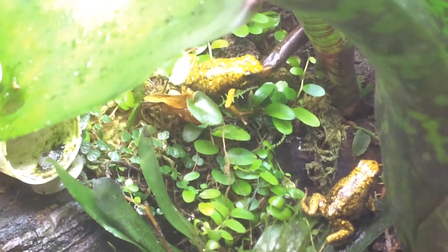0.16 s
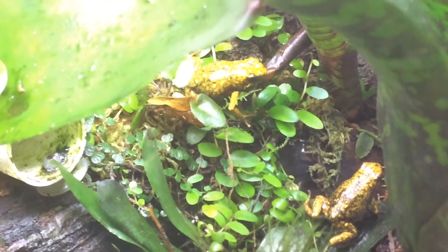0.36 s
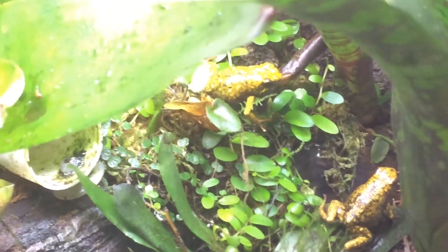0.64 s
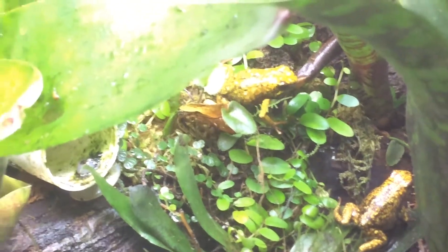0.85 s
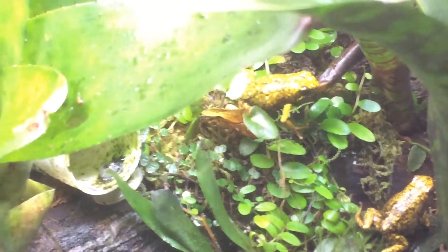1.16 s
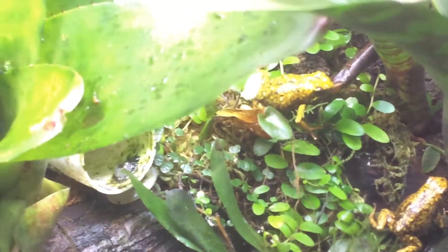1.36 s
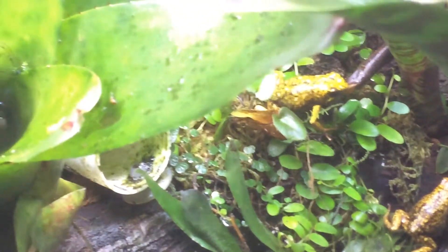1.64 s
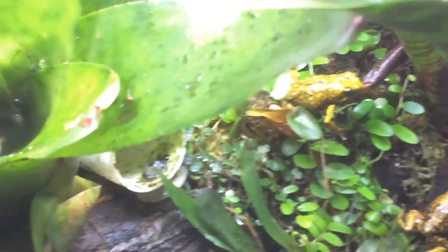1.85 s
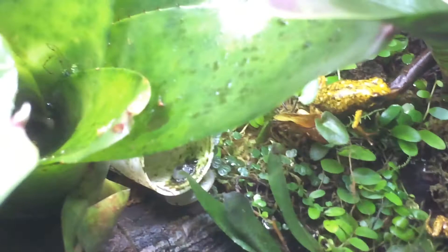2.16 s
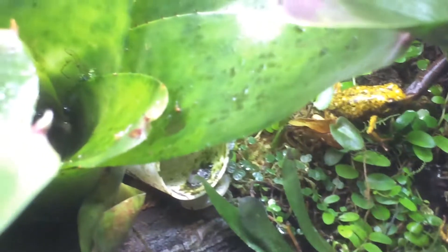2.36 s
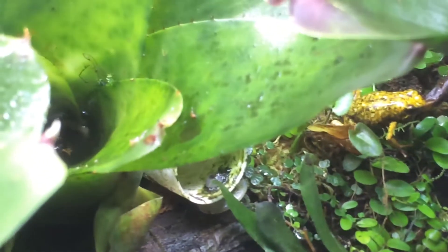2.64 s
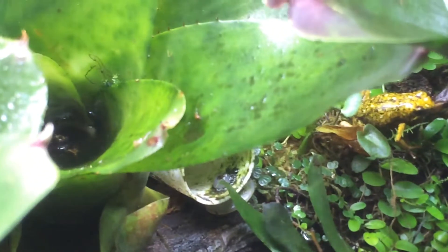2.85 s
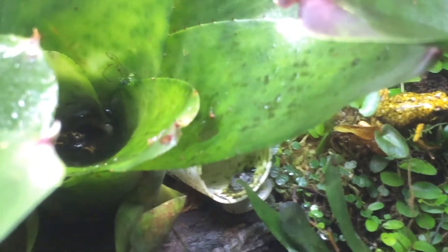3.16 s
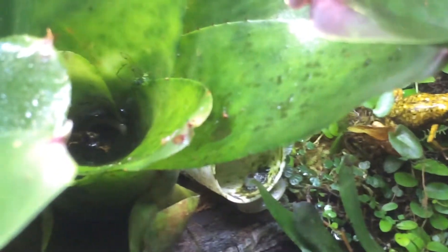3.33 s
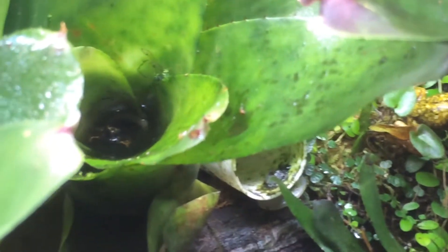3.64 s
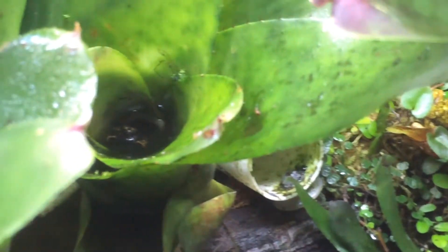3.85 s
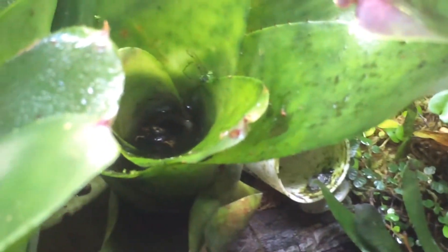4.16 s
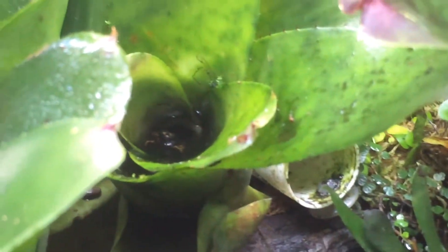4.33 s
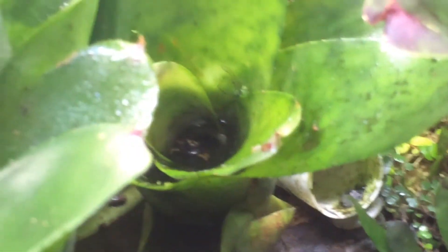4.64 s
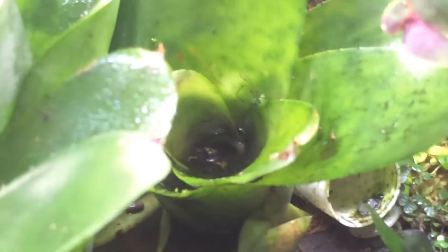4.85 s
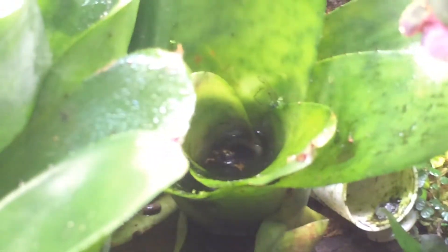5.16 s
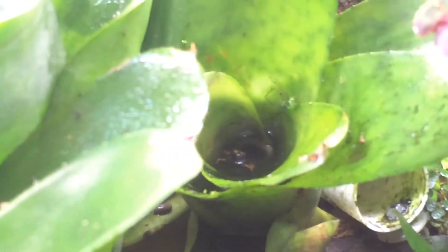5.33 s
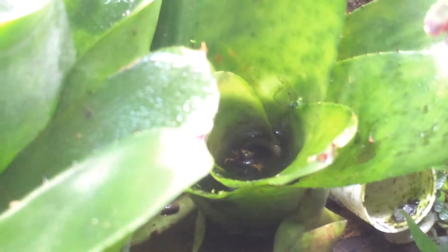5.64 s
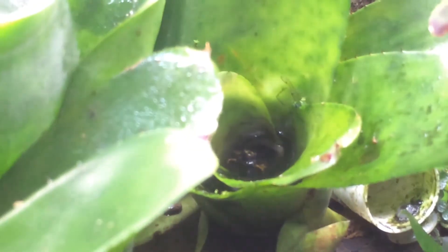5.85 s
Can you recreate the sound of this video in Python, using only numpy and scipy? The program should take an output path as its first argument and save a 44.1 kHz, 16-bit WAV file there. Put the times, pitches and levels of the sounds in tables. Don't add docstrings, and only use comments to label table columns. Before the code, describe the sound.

A small frog chirps steadily about six times a second in a glass terrarium, gradually softening over faint hum, hiss and soft handling bumps.

```python
import sys
import numpy as np
from scipy import signal
from scipy.io import wavfile
from scipy.ndimage import uniform_filter1d

SR = 44100
rng = np.random.default_rng(int(sys.argv[2]) if len(sys.argv) > 2 else 0)


def level_to_linear(level):
    exponent = np.asarray(level, float) / 20
    return 10 ** exponent


def inscribe(sig):
    pcm = np.round(np.clip(np.atleast_2d(sig).T, -1, 1) * 32767)
    wavfile.write(sys.argv[1], SR, pcm.astype(np.int16))


N = 264159
LEAD_IN = 4410
END_AT = 1.09

# time in seconds, share of the far colour from 0 to 1.
DISTANCE = [
    (0, 0.08),
    (2.498, 0.16),
    (3.399, 0.33),
    (4.399, 0.5),
    (4.8, 0.72),
    (6, 0.74),
]
# time in seconds, thump level in dB, knock level in dB.
BUMPS = [(0.25, -51.5, -68), (0.549, -60, -80), (0.668, -52, -51), (0.785, -55, -73), (1.015, -54, -60),
         (2.576, -58.5, -64), (2.805, -53.5, -62), (3.037, -58.5, -76), (3.495, -60.5, -58),
         (3.622, -59.5, -51.5), (3.767, -64, -53), (3.946, -58.5, -67), (4.38, -57.5, -62),
         (4.512, -64, -57), (4.685, -54.5, -67), (5.508, -61, -64), (5.721, -63, -75), (5.862, -60, -79)]


def evened(x):
    return x / np.sqrt(np.mean(x ** 2) + 1e-20)


def read(points, hz):
    f, value = np.transpose(points)
    return np.interp(np.log(hz + 1), np.log(f + 1), value)


def add(mix, s, sound):
    at = round(s * SR)
    sound = sound[max(-at, 0):]
    part = mix[max(at, 0):][:len(sound)]
    part += sound[:len(part)]


def band(x, lo_hz, hi_hz, order=3):
    return signal.sosfilt(signal.butter(order, [lo_hz, hi_hz], "bandpass", fs=SR, output="sos"), x)


def swell(part, start_db, bend, full, lets_go, end_db):
    rise = start_db * (1 - np.clip(part / full, 0, 1) ** bend)
    release = np.clip((part - lets_go) / max(END_AT - lets_go, .01), 0, 1)
    return rise + end_db * release


def chirp(row, luck):
    pace = [(0, .32), (.15, .37), (.3, .5), (.45, .72), (.6, .9), (.74, .98), (.9, 1.01), (.94, 1.17),
            (1.1, 1.22)]
    # start in dB, bend of the rise, fraction where full,
    # fraction where it lets go, end in dB.
    swells = [
        (-15, 1.06, 0.48, 1.084, -20),
        (-32.5, 0.58, .8, 0.92, -24.5),
        (-9.5, 1.85, 0.63, 0.93, -24),
        (-31.5, 1.19, 0.89, 0.87, -28),
        (-29, 2.6, 0.91, .97, -28),
        (-30, 5.1, 1.0, 1.028, -11),
    ]
    jitter, uneven_db, breathy = .022, 1.6, .06
    break_at, break_jitter = .95, .08
    full_rate_hz, rate_spread = 486, .018

    s, length, sac_db, strain_db = row
    body_db = -33 + 0.38 * (sac_db + 26)
    shrill_db = -49 + strain_db
    t = np.arange(0, END_AT * length, 1 / SR)
    body, sac, upper, shrill, squeak, croak = (swell(t / length, *layer) for layer in swells)

    rate = full_rate_hz * (1 + rate_spread * luck[-1]) * np.interp(t / length, *np.transpose(pace))
    turns = np.cumsum(rate) / SR
    at = np.r_[0, np.flatnonzero(np.diff(np.floor(turns)))]
    wobble = jitter * 490 / rate[at] + break_jitter * (t[at] > break_at * length)
    late = -(turns[at] % 1) + wobble * luck[:len(at)]
    at = np.clip(at + late * SR / rate[at] * (at > 0), 0, len(t) - 2)
    whole, between = at.astype(int), at % 1
    size = level_to_linear(uneven_db * luck[60:len(at) + 60]) * np.sqrt(SR / rate[whole])
    size[0] *= .15

    pulses = np.zeros(len(t))
    np.add.at(pulses, whole, size * (1 - between))
    np.add.at(pulses, whole + 1, size * between)
    leak = (breathy + .6 * np.exp(-t / .008)) * np.clip(t / .003, 0, 1)
    pulses += leak * luck[200:200 + len(t)]
    rush = level_to_linear(body_db - 35.5) * np.clip(t / .002, 0, 1) * (.5 + 1.1 * np.exp(-t / 0.013))
    rush = rush * (1 + 0.72 * np.cos(2 * np.pi * turns)) * luck[4200:4200 + len(t)]
    fundamental = level_to_linear(body_db - 36.5 + 1.2 * body) * np.sin(2 * np.pi * turns)

    levels_db = [body_db + body, sac_db + sac, body_db - 15.5 + upper,
                 shrill_db - 3.5 + shrill, shrill_db + .6 + squeak,
                 body_db - 8.5 + croak,
                 body_db - 40.5 + .8 * body]
    return [pulses * level_to_linear(db) for db in levels_db] + [rush, fundamental]


def ring(modes, lo_hz, hi_hz):
    t = np.arange(4096) / SR
    h = np.zeros(len(t))
    for k, (f, width, db) in enumerate(modes):
        width = max(width, 105)
        h += (-1) ** k * level_to_linear(db) * width * np.exp(-np.pi * width * t) * np.sin(2 * np.pi * f * t)
    h = band(h, lo_hz, hi_hz)
    return h / np.linalg.norm(h)


def snap(top_hz=3000, fall_hz=1500, length_s=0.002049):
    u = np.linspace(0, 1, int(length_s * SR))
    cycles = length_s * (top_hz * u - fall_hz * u ** 2 / 2)
    h = np.sin(np.pi * u ** 0.97) ** 2 * np.sin(2 * np.pi * cycles)
    h = band(np.r_[h, 0 * h], 900, 4000, order=2)
    return h / np.linalg.norm(h)


def frog():
    # start in seconds, length in seconds, strength in dB, strain in dB.
    chirps_near = [(-0.044, 0.06, -29.5, -0.5), (.1274, .065, -30.5, 0), (.296, 0.063, -27, 0.5),
                   (.4677, 0.063, -29, 0.5), (.638, 0.064, -29.5, 0.5), (.8109, 0.064, -28.5, 0),
                   (.9852, 0.063, -29, 1), (1.1583, 0.059, -28, -1.5), (1.328, 0.061, -30, 0),
                   (1.4978, 0.065, -28, 1), (1.6679, 0.065, -27.5, 3.5), (1.8414, 0.061, -28.5, 1.5),
                   (2.011, .066, -29.5, 1), (2.182, 0.067, -27.5, 1.5), (2.3534, 0.066, -30, 1.5),
                   (2.527, 0.065, -28.5, 2), (2.7013, 0.064, -29.5, 2), (2.8733, .068, -28.5, 2.5)]
    chirps_far = [(3.0499, .066, -30, 1.5), (3.226, 0.07, -32.5, 2), (3.403, .066, -29.5, 2),
                  (3.5758, 0.068, -35, 2.5), (3.7512, 0.068, -33.5, 0.5), (3.9266, 0.063, -32, 2),
                  (4.099, 0.067, -32.5, 1.5), (4.269, .066, -33.5, 1), (4.443, 0.066, -35.5, 0.5),
                  (4.6182, 0.059, -36, -1.5), (4.7862, 0.061, -36.5, -2), (4.963, 0.062, -35.5, -1.5),
                  (5.134, .056, -36.5, -0.5), (5.304, 0.06, -37.5, -1), (5.4722, 0.068, -37, -1),
                  (5.6458, 0.063, -36.5, -1), (5.8143, 0.064, -38, -1), (5.9878, 0.042, -37, -2)]
    # frequency in Hz, width in Hz, level in dB.
    body_near = [(1428, 64, -4), (1658, 90, 3.5), (1949.5, 29, 8), (1990, 100, 1.5), (2472, 73, 6),
                 (2400, 41, -18.5)]
    body_far = [(1353, 34, -6.5), (1679, 87, 7.5), (1980, 67, -3.5), (2010, 93, 2), (2614, 78, -28),
                (2578, 35, 6)]
    sac_near = [(2700, 200, -8), (2944, 54, 2.5), (3226, 45, -12), (2876, 410, -2.5)]
    sac_far = [(2725, 66, -14.5), (2898, 81, 2), (3036, 93, -0.5), (3281, 85, -5), (3002, 380, -3.5)]
    upper_modes = [(3483, 55, 2.5), (3740, 190, 0.5), (4293, 220, -4), (4820, 110, -9.5), (5180, 220, -11)]
    shrill_modes = [(6870, 82, -2.5), (6786, 130, 6), (7180, 130, -0.5), (7570, 440, -10)]
    squeak_modes = [(5566, 120, -9), (6282, 140, 1.5)]
    croak_modes = [(965, 90, -6), (1211, 81, 1), (1646, 75, 4)]
    glint_modes = [(14560, 170, 0)]
    ringing_share = .5

    chirps = chirps_near + chirps_far
    luck = rng.standard_normal((len(chirps), 8400))
    drive = np.zeros((9, N + LEAD_IN))
    for row, chance in zip(chirps, luck):
        for track, layer in zip(drive, chirp(row, chance)):
            add(track, row[0] + LEAD_IN / SR, layer)
    body, sac, upper, shrill, squeak, croak, glint, rush, fundamental = drive

    away = np.clip(np.interp(np.arange(-LEAD_IN, N) / SR, *np.transpose(DISTANCE)), 0, 1)
    near, far = np.sqrt(1 - away), np.sqrt(away)
    rung = np.sqrt(ringing_share) * body
    paths = [(rung * near, ring(body_near, 1100, 3300)),
             (rung * far, ring(body_far, 1100, 3300)),
             (np.sqrt(1 - ringing_share) * body, snap()),
             (sac * near, ring(sac_near, 2300, 3350)),
             (sac * far, ring(sac_far, 2300, 3600)),
             (upper, ring(upper_modes, 3300, 5230)),
             (shrill, ring(shrill_modes, 6000, 8200)),
             (squeak, ring(squeak_modes, 5300, 6700)),
             (croak, ring(croak_modes, 1100, 1950)),
             (glint, ring(glint_modes, 14000, 15100))]
    voice = sum(signal.oaconvolve(x, h)[:len(x)] for x, h in paths)
    return voice + band(rush, 5500, 15500, order=2) + fundamental


def tail(t60_of_hz, gap_s):
    taps = np.zeros(SR // 2)
    slots = np.arange(0, len(taps) - 20, 20)
    at = slots + rng.integers(0, 20, len(slots))
    taps[at] = rng.choice([-1., 1.], at.shape)
    hz, t, z = signal.stft(taps, SR, nperseg=128)
    h = signal.istft(z * level_to_linear(-60 * t / t60_of_hz(hz)[:, None]), SR, nperseg=128)[1]
    return np.r_[np.zeros(int(gap_s * SR)), h / np.linalg.norm(h)]


def terrarium(x):
    # frequency in Hz, t60 in seconds.
    tank_decay = [(1000, 0.042), (2000, 0.033), (3000, 0.085), (4500, 0.084), (6300, 0.04), (12000, 0.077)]
    tank_db, room_db, room_t60_s = -8, -19, 0.15
    far_wet_db = 2.5
    sway_hz = .2

    t = np.arange(-LEAD_IN, N) / SR
    fed = x * level_to_linear(far_wet_db * np.interp(t, *np.transpose(DISTANCE)))
    room = tail(lambda hz: room_t60_s + 0 * hz, .01)
    wet = x + level_to_linear(room_db) * signal.oaconvolve(fed, room)[:len(x)]
    for k in range(3):
        window = np.sqrt(2 / 3) * np.cos(np.pi * (sway_hz * t + k / 3))
        glass = tail(lambda hz: read(tank_decay, hz), 0.001984)
        wet = wet + level_to_linear(tank_db) * signal.oaconvolve(fed * window, glass)[:len(x)]
    return wet[LEAD_IN:]


def grip(t):
    # time in seconds, rumble in dB.
    hold = [(0, 1), (.3, -5), (1.05, -2.5), (1.2, -2.5), (2.6, -0.5), (3.0, -2), (3.6, -0.5), (4.6, -1.5),
            (5.99, -3.5)]
    share, from_db, surge_s = 0.85, -60, .03
    level_db = np.interp(t, *np.transpose(hold))
    for s, thump_db, _ in BUMPS:
        level_db = level_db + share * max(thump_db - from_db, 0) * np.exp(-((t - s) / surge_s) ** 2)
    return level_db


def resonate(x, hz, width):
    turn = np.exp(2j * np.pi * hz * np.arange(len(x)) / SR)
    r = np.exp(-np.pi * width / SR)
    return 2 * (turn * signal.lfilter([1 - r], [1, -r], x / turn)).real


def background(patchy_db=3.0):
    # frequency in Hz, density in dB per Hz.
    floor_shape = [(12, -47.5), (50, -4), (122, 0), (250, -12.5), (500, -13.5), (837, -19.5), (3000, -18),
                   (15600, -35.5)]
    # frequency in Hz, width in Hz, rms level in dB.
    hum = [
        (58.5, 11, -70.5),
        (119, 6.2, -71.5),
    ]
    floor_db, hop = -66, 256

    frames, hz = N // hop + 5, np.fft.rfftfreq(1024, 1 / SR)
    a, b, patches = rng.standard_normal((frames, 513, 3)).T
    patches = uniform_filter1d(patches, size=12, axis=0)
    patches = evened(uniform_filter1d(patches, size=8, axis=1))
    grip_db = grip(np.arange(frames) * hop / SR)
    column = hz[:, None]
    level_db = read(floor_shape, hz)[:, None] + patchy_db * patches / (1 + column / 6000)
    level_db = level_db + grip_db / (1 + (column / 400) ** 2)
    noise = signal.istft((a + 1j * b) * level_to_linear(level_db), nperseg=1024, noverlap=768)[1][:N]
    noise = level_to_linear(floor_db) * evened(noise)

    surge = level_to_linear(np.interp(np.arange(N), np.arange(frames) * hop, grip_db))
    for f, width, db in hum:
        waver = resonate(resonate(rng.standard_normal(N), f, width), f, width)
        noise = noise + level_to_linear(db) * surge * evened(waver)
    return noise


def bumps(thump_hz=105, knock_hz=330):
    # time in seconds, peak in dB.
    lone_knocks = [
        (0.481, -49.5),
        (1.25, -53),
        (4.827, -68),
    ]
    # time in seconds, peak in dB.
    ticks = [(0.282, -77), (0.3553, -62.5), (0.5256, -60), (1.73, -54), (2.416, -64), (2.587, -57),
             (2.937, -60), (3.308, -70), (3.463, -65), (3.9814, -55.5), (4.156, -64), (4.8457, -62.5),
             (4.9487, -73), (5.032, -64), (5.187, -60), (5.969, -82)]

    out, t = np.zeros(N), np.arange(1800) / SR
    swing = np.sin(2 * np.pi * thump_hz * t * (1.3 - 12 * t))
    swing = swing * (1 - np.exp(-t / 0.0029)) * np.exp(-t / 0.0045)
    knock = np.sin(2 * np.pi * knock_hz * t) * (1 - np.exp(-t / 0.0025)) * np.exp(-t / 0.00098)
    for s, thump_db, knock_db in BUMPS:
        add(out, s - .005, -level_to_linear(thump_db + 14) * swing - level_to_linear(knock_db + 18) * knock)
    for s, db in lone_knocks:
        add(out, s, level_to_linear(db + 15) * knock)
    for (s, db), noise in zip(ticks, rng.standard_normal((len(ticks), len(t)))):
        burst = noise * (t / 0.00072) * np.exp(-t / 0.0011)
        add(out, s, level_to_linear(db + 7) * band(burst, 2500, 16000, order=1))
    return out


def scene():
    return (terrarium(frog()) + background() + bumps())[None]


def band_limit(x):
    return signal.sosfilt(signal.butter(12, 16130, fs=SR, output="sos"), x)


def record(dry):
    lowpass = signal.firwin(1023, 15340, window=("kaiser", 9), fs=SR)
    limited = signal.oaconvolve(dry, lowpass[None], "same")
    return band_limit(limited)


dry = scene()
out = record(dry)
inscribe(out)
```